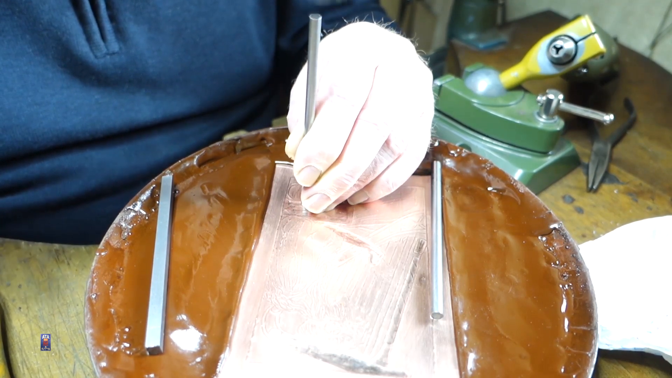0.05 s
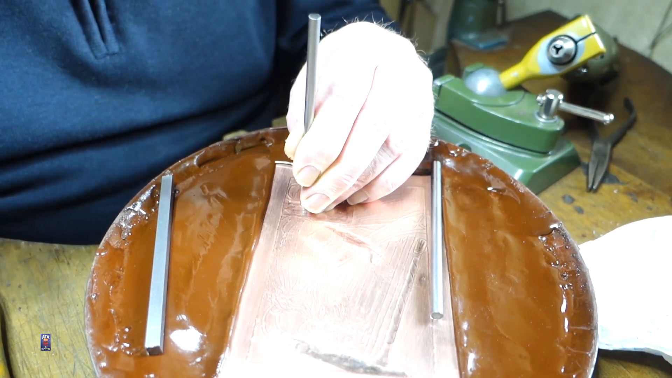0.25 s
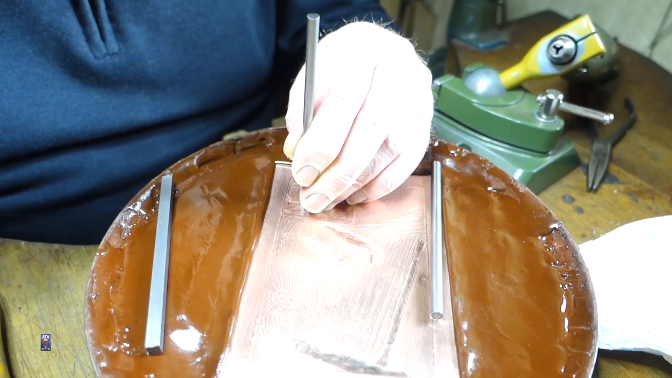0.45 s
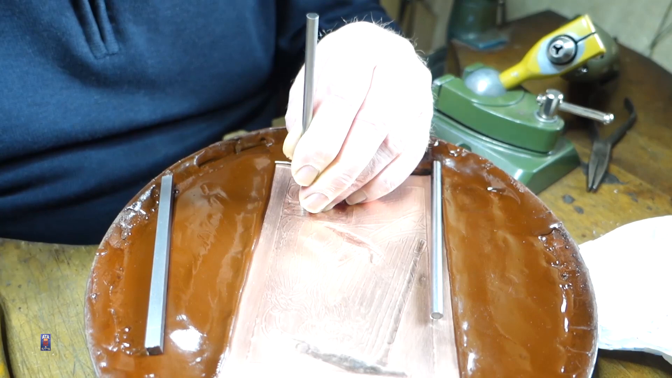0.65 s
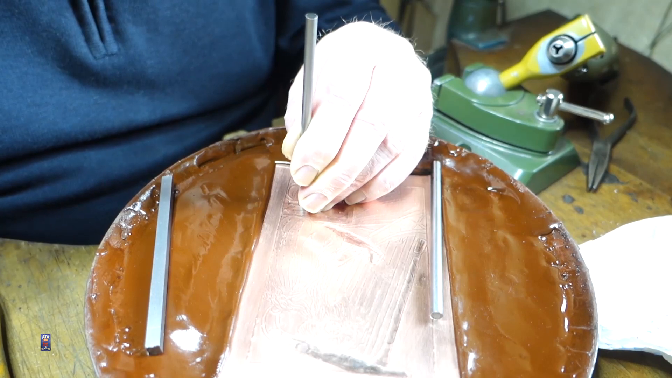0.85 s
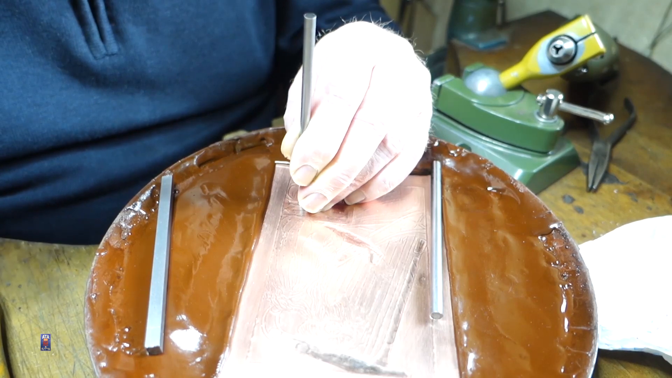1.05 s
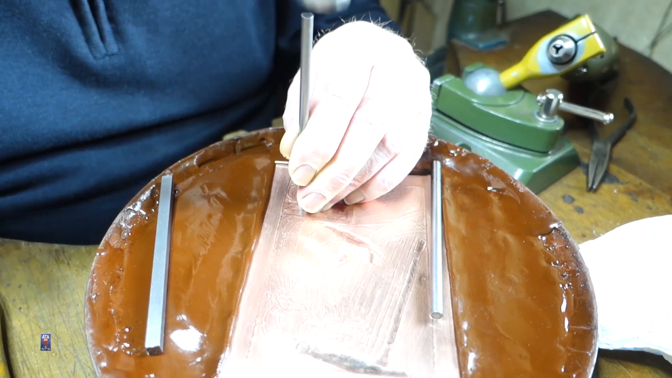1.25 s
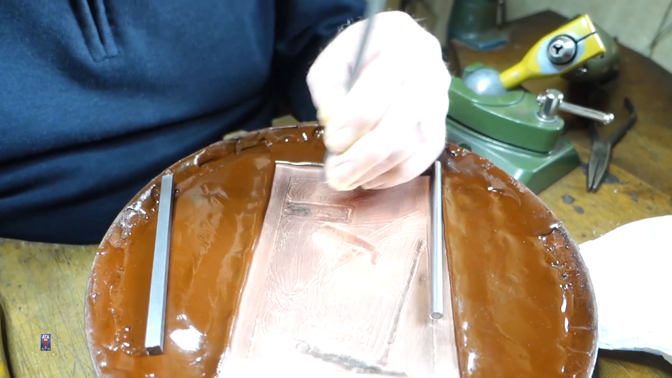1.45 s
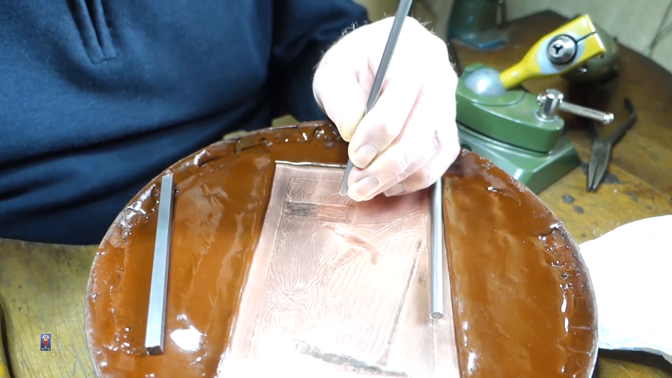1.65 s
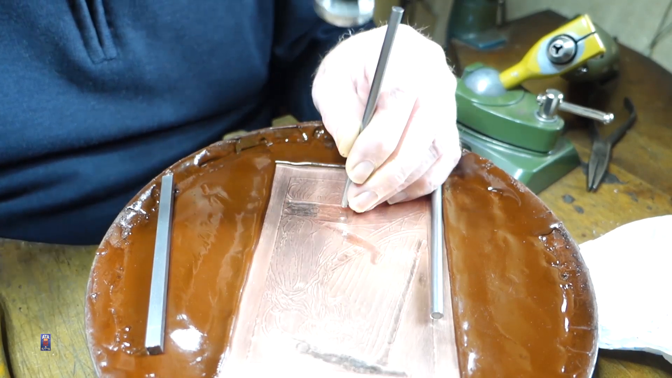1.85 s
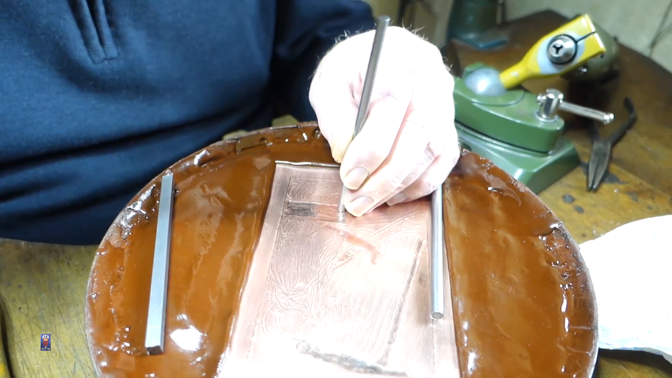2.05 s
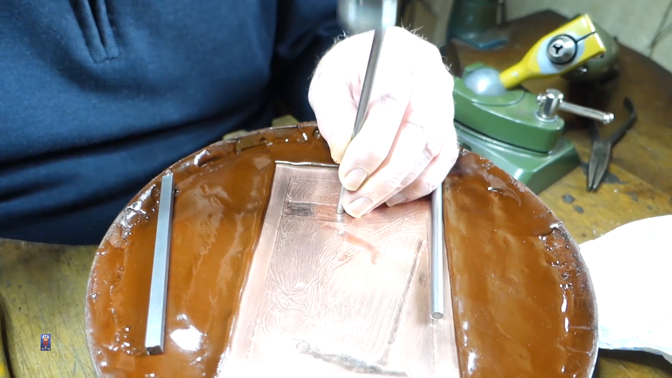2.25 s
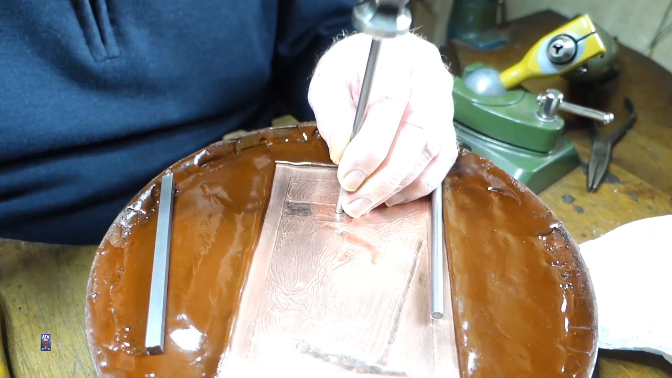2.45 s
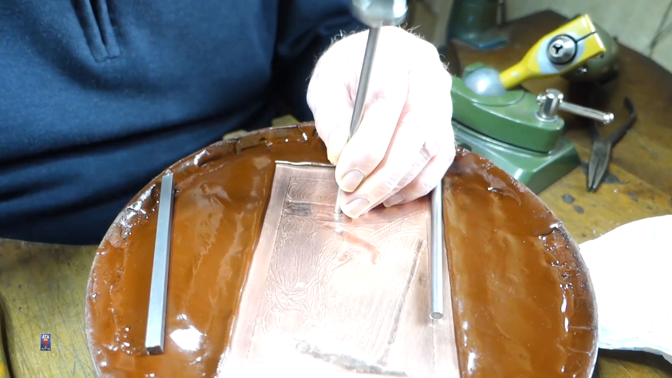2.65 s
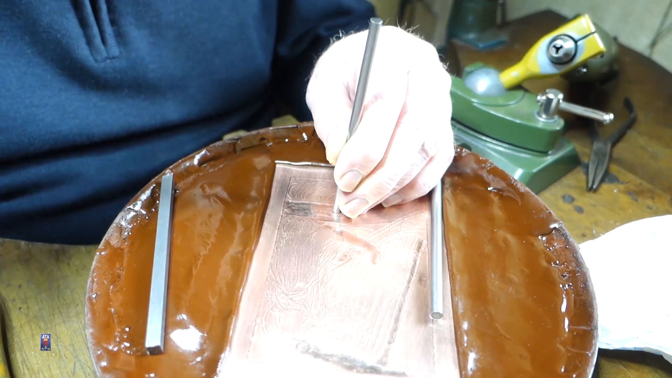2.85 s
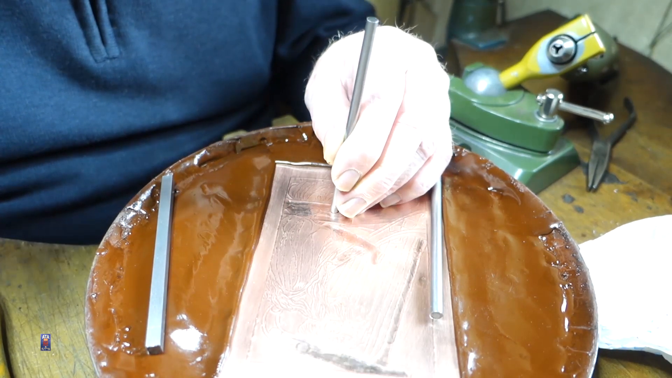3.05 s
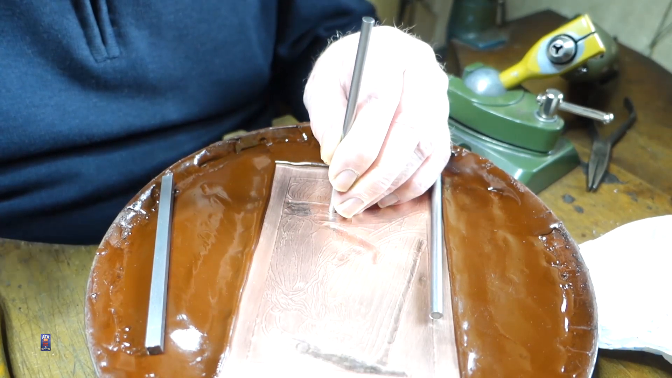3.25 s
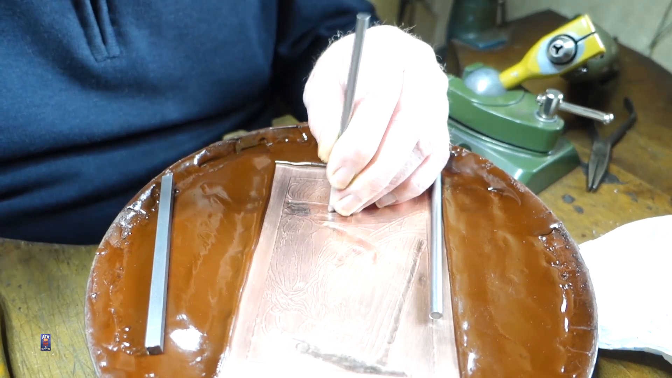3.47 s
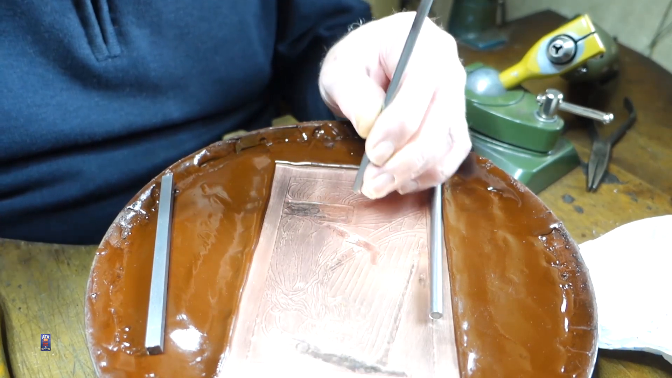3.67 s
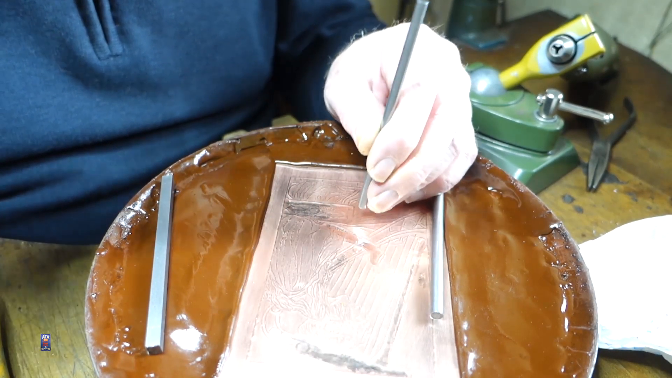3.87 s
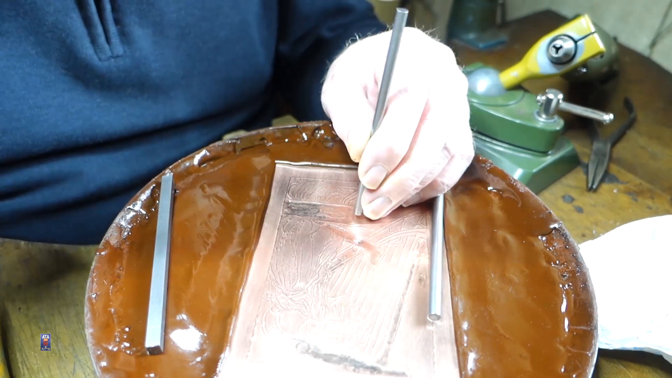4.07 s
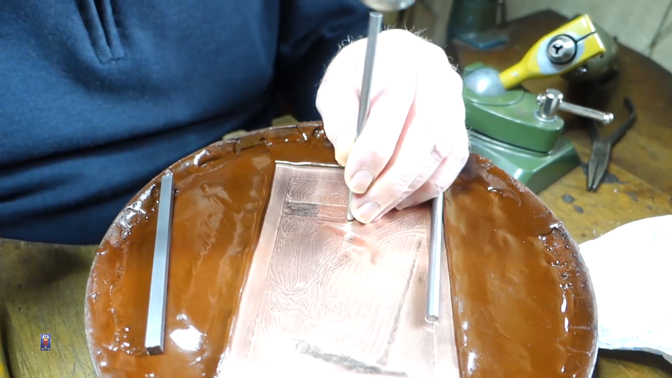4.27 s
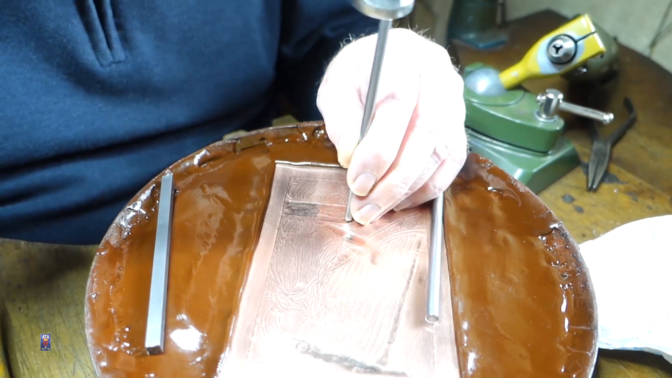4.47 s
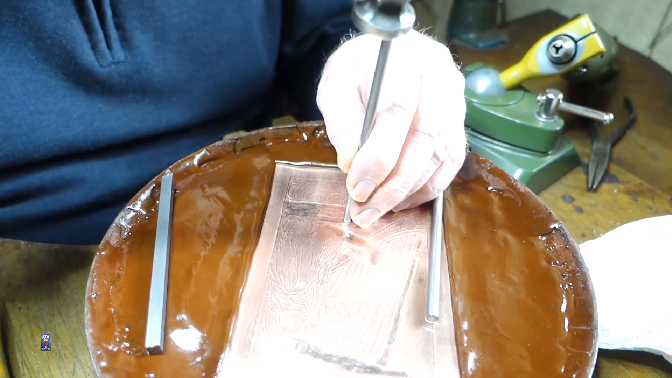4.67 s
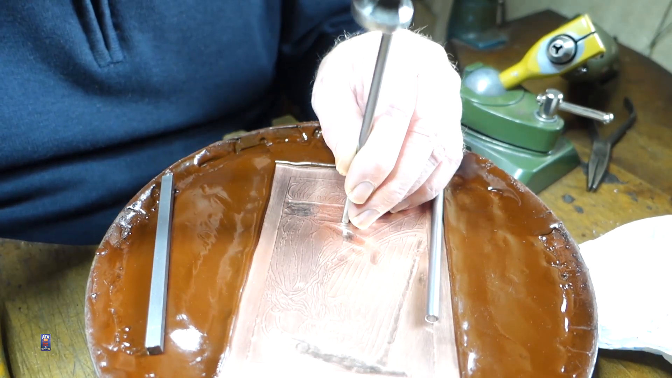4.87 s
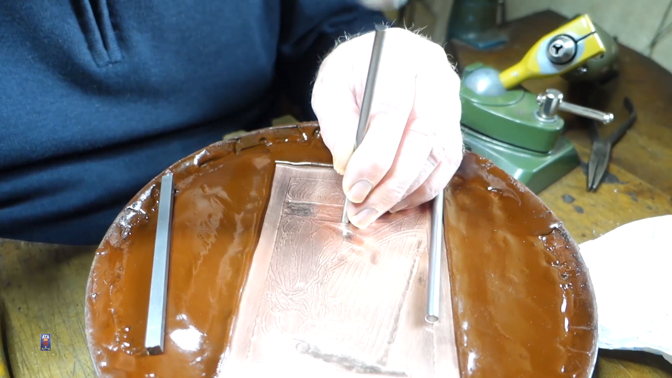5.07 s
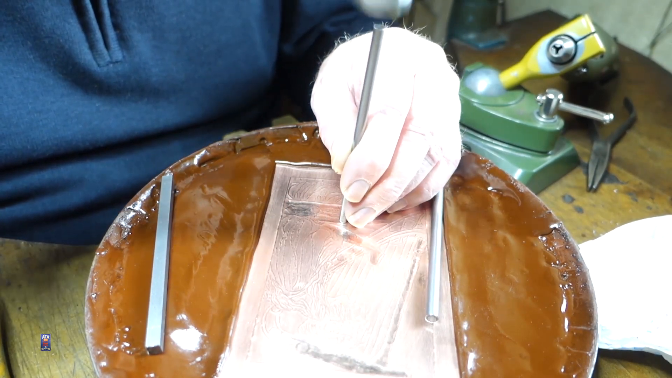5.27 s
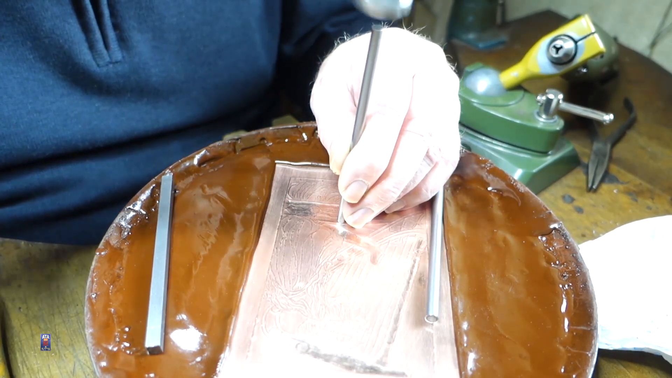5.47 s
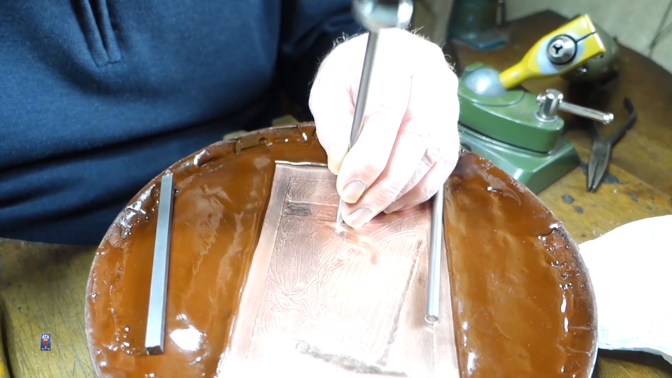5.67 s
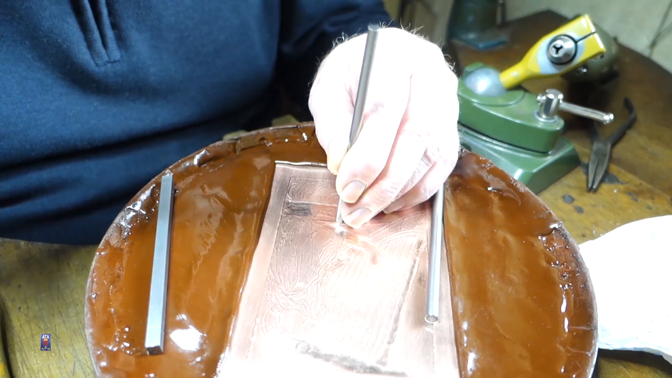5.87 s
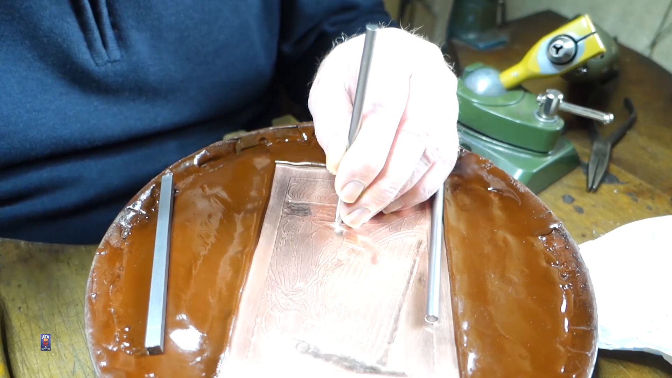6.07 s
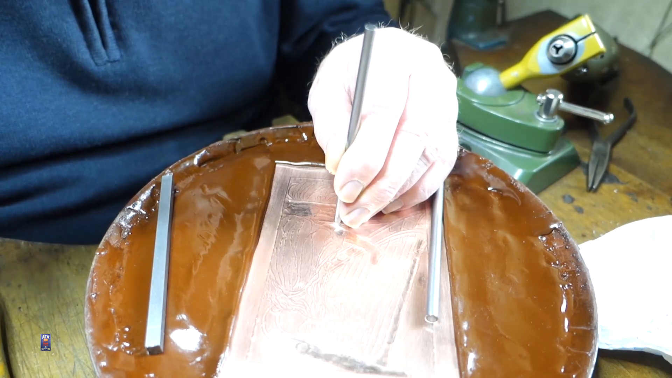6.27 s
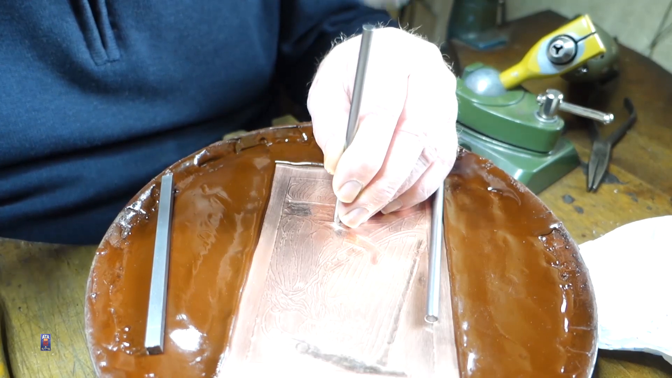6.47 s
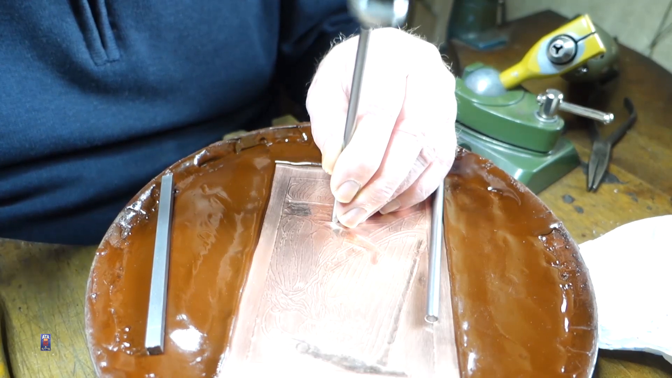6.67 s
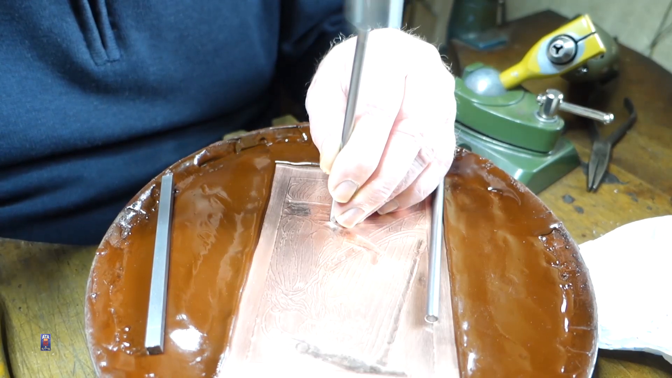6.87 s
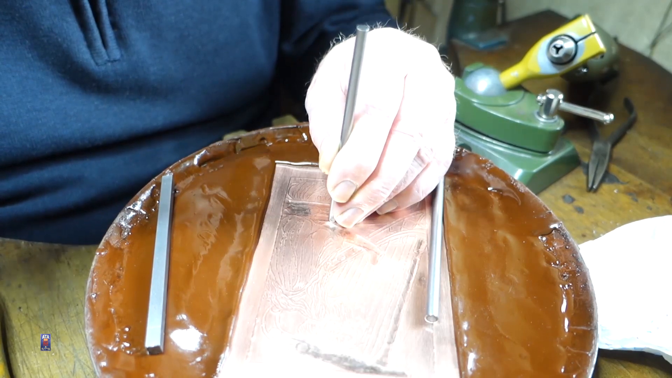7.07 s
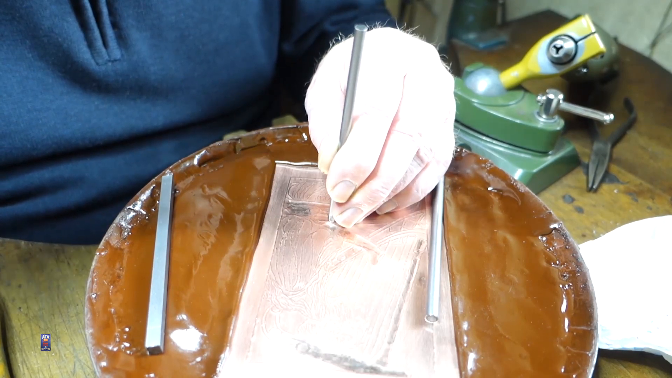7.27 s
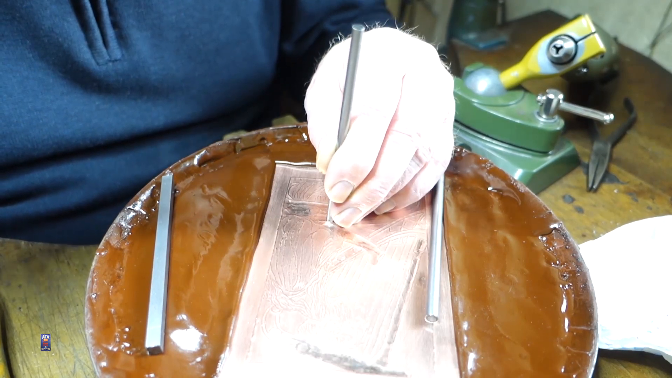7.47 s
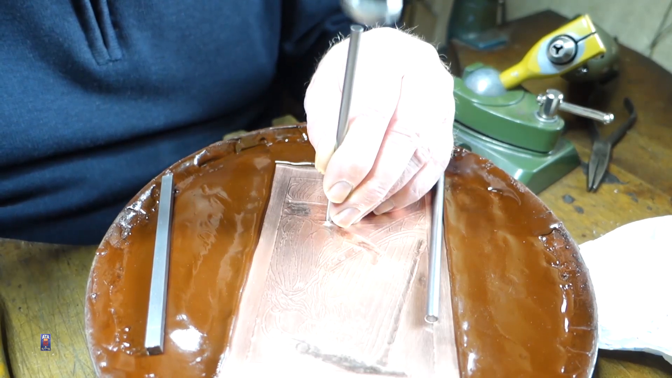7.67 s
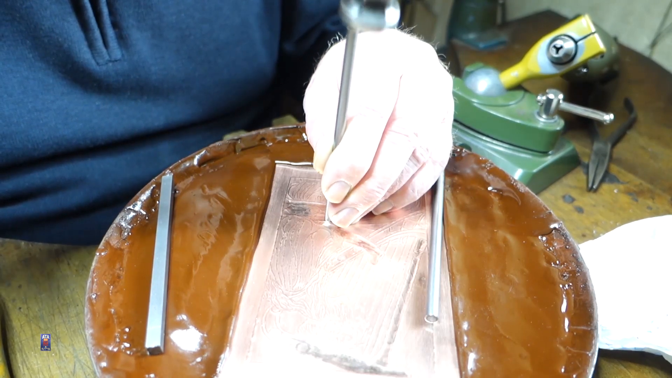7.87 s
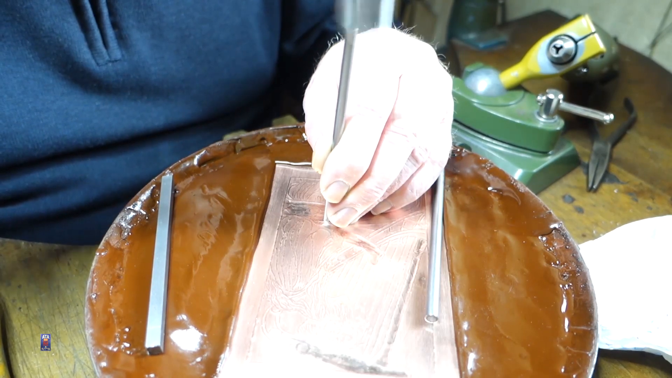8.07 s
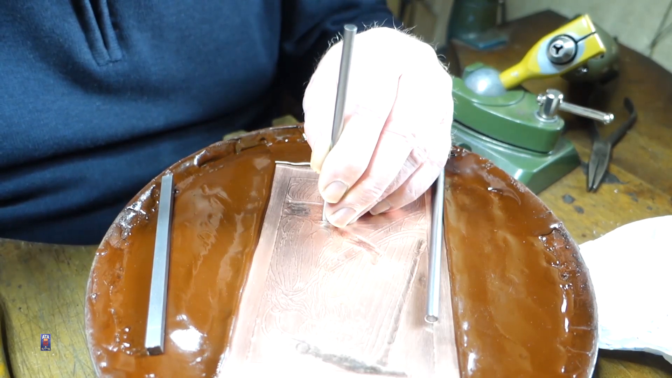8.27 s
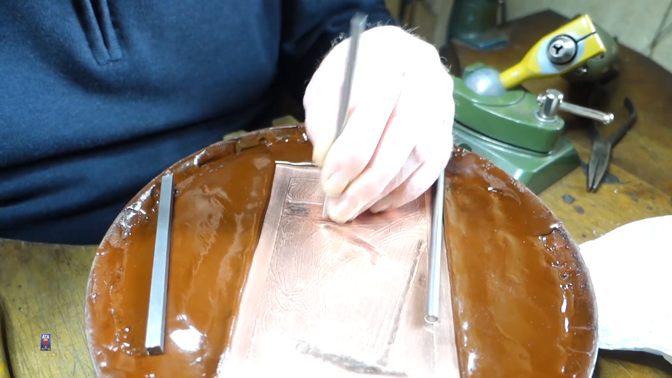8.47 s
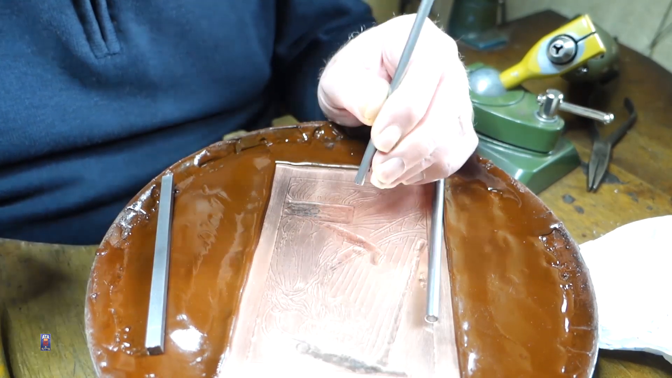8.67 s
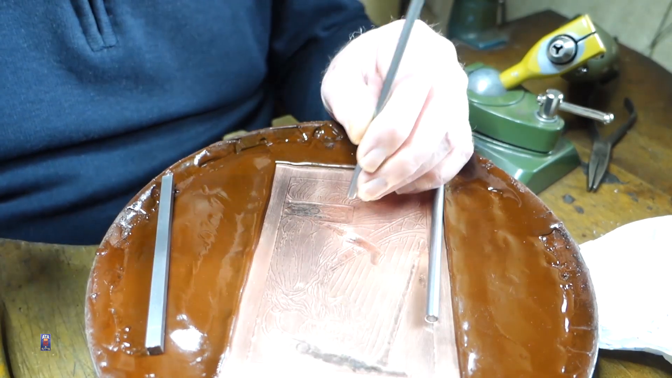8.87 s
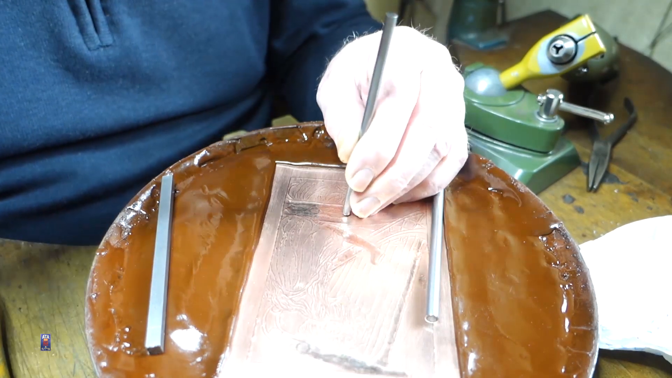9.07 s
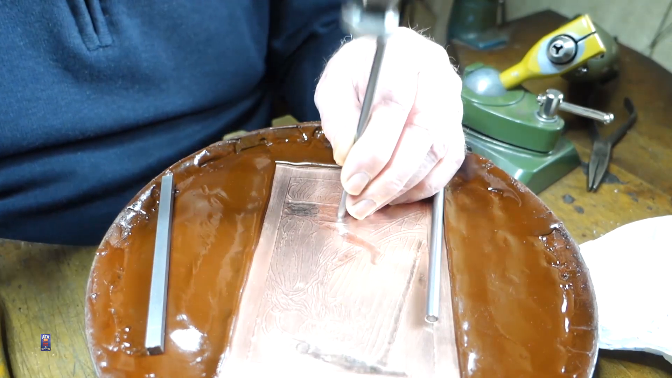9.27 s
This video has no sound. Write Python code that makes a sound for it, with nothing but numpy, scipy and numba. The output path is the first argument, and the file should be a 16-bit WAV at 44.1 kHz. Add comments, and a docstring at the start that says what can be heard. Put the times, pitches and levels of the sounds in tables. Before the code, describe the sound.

A small hammer taps a steel punch on copper sheet, four even ringing blows a second, in three runs with pauses, in a workshop.

```python
"""Chasing copper on a pitch bowl

A small hammer taps a steel punch about four times a second on a copper sheet, in three runs with pauses between.
Each blow is a thud, a noisy crack and damped sines for sheet, hammer and punch; now and then the punch just ticks.
Echoes, standing waves and a fading noise tail make the workshop. Shaped noise and two gliding sines pass as a vehicle.
A limiter ducks the loud strikes, so the room swells up just after them."""
import sys
import numpy as np
from scipy import signal
from scipy.fft import rfft, irfft, next_fast_len
from scipy.io import wavfile
from scipy.ndimage import uniform_filter1d, minimum_filter1d
from numba import njit

SR = 44100
rng = np.random.default_rng(int(sys.argv[2]) if len(sys.argv) > 2 else 0)


def pcm_store(signal):
    """Save signal as 16-bit PCM."""
    levels = np.round(np.clip(np.atleast_2d(signal), -1, 1) * 32767)
    wavfile.write(sys.argv[1], SR, levels.astype(np.int16).T)


N = 411012  # length of the scene [samples]


def undb(db):
    """Turn decibels into an amplitude factor."""
    return 10 ** (np.asarray(db) / 20)


def unit(x):
    """Scale to an energy of one."""
    return x / np.sqrt(np.sum(x ** 2))


def across(hz, table, axis=1):
    """Read one column of a table between its rows, on a log-frequency axis."""
    table = np.array(table, float)
    return np.interp(np.log(np.maximum(hz, 1)), np.log(table[:, 0]), table[:, axis])


def colour(x, spectrum):
    """Filter a sound by a smooth spectrum."""
    size = next_fast_len(x.shape[-1])
    hz = np.arange(size // 2 + 1) * SR / size
    return irfft(rfft(x, size) * undb(across(hz, spectrum)), size)[..., :x.shape[-1]]


def tilted(spectrum, db_per_octave):
    """Brighten or dull a spectrum by a steady slope."""
    return [(hz, db + db_per_octave * np.log2(hz)) for hz, db in spectrum]


def knock(spectrum, size=4096):
    """Make the most compact pulse with this spectrum that does not begin before the hit."""
    hz = np.arange(size // 2 + 1) * SR / size
    # folding the cepstrum (spectrum of the log spectrum) forward in time gives the minimum phase
    cepstrum = irfft(np.log(undb(across(hz, spectrum))))
    cepstrum[1:size // 2] *= 2
    cepstrum[size // 2 + 1:] = 0
    return unit(irfft(np.exp(rfft(cepstrum))))


def ring(modes, t, stretch=1):
    """Add up damped sines, as struck metal rings; a wide resonance dies fast."""
    out = np.zeros(len(t))
    for hz, width, db in modes:
        decay = np.exp(-np.pi * width * t)
        out += undb(db) * width * decay * np.sin(2 * np.pi * hz * stretch * t)
    return unit(out)


def chatter(pulse, decay_s):
    """Smear a pulse into a brief, fading burst of tiny contacts."""
    grit = rng.standard_normal(len(pulse)) * np.exp(-np.arange(len(pulse)) / SR / decay_s)
    return unit(signal.fftconvolve(grit, pulse)[:len(pulse)])


def add(track, s, sound):
    """Lay a sound on a track that starts one second early, so that an earlier blow can ring on."""
    i = SR + int(s * SR)
    track[i:i + len(sound)] += sound


def blows(strike_s=0.0014, contact_s=0.0048, lag_s=0.0005, grit_db=-1, bed_hz=2950):
    """The hammer cracks on the punch; sheet, hammer and bowl follow as the tip sinks in, and the bowl rebounds."""
    # hammer blows; a square blow rings hammer and sheet, a glancing one does not
    # (time [s], force [dB], squareness [dB])
    taps = [(-0.078, -2.5, 0.5), (0.1519, -0.5, -1), (0.3928, -3, 0), (0.62, -2, 0), (0.8378, -2, 0),
            (1.0656, -1.5, -0.5), (1.297, -2, -0.5), (2.198, -22.5, 6.5), (2.4846, 0, 0), (2.7327, 0, 1.5),
            (2.9751, -2.5, 3), (3.219, -2, 2), (3.447, -1, 0), (4.9905, -13, -14.5), (5.2519, -1, -5.5),
            (5.4886, 1, -3.5), (5.7287, 0, -0.5), (5.98, 0.5, 0.5), (6.2382, 1, 0), (6.486, 0, -0.5),
            (6.7195, 1, -3), (6.9588, 0.5, -5.5), (7.1985, -2, 0), (7.4372, -1.5, -1), (7.6857, -2, -1.5),
            (7.921, -1.5, -1.5), (8.1584, -1, -1.5), (8.3974, -2.5, 0.5)]
    # the colour of the blows changes at these times, the last one midway through the third run
    # (begins [s], sheet [dB], hammer [dB], punch ring [dB], punch zing [dB], crack [dB],
    #  crack brightness [dB per octave]); later steps add to these values
    colours = [(-1, 5.5, 6, 3.5, -14, -3.5, -3), (2, -2.9, 5.5, 2.6, -7.5, -1.5, 0),
               (7, -3.5, 10.5, 5, -9, -4, 2.5)]
    # resonances of the struck parts, before each blow shifts their pitch a little
    # (frequency [Hz], width [Hz], relative level [dB])
    sheet_modes = [(1471.5, 61, 18), (1600, 200, 7.5)]
    hammer_modes = [(2307, 97, 11.5), (2550, 80, -16.5), (2178, 240, -0.5), (2580, 490, -53)]
    clink_modes = [(4263, 51, 3), (4350, 420, 0), (4915, 180, 7.5)]
    punch_modes = [(8080, 460, 2.6), (8630, 180, 9), (9254, 750, 14.3), (11040, 96, 7.5)]
    zing_modes = [(15430, 260, 0)]
    # shapes of the bowl's thud, its rebound and the steel crack (frequency [Hz], relative level [dB])
    thud_spectrum = [(20, -23), (45, 13.5), (80, 5), (140, 1), (270, -8.5), (400, -9), (600, 5), (850, 8),
                     (1100, -3.5), (1850, 5.5), (2600, 8.5), (3400, -22), (8000, -76)]
    rebound_spectrum = [(20, -22), (48, 3.5), (75, -8.5), (120, 0), (270, -4), (450, -22.5), (2000, -67.5)]
    crack_spectrum = [(1000, -1.5), (2600, 1), (3300, -30.5), (3800, -9.5), (4300, 4), (4900, -0.5),
                      (5600, 0), (7000, 0), (10300, 2.5), (12200, -3), (14500, 2), (15700, -0.5),
                      (16500, -17)]

    thud_db, clink_db = 0.8, -13.5
    extra_clink_db, clink_fade_s = 22, 0.27  # extra clink just after each colour begins, dying away quickly
    extra_crack_db, crack_fade_s = 3, 0.41  # the crack, too, is louder just after each colour begins
    dulling_per_s = 0.68  # the crack dulls until the next colour [dB per octave, each second]
    steel_slope = 0.45  # the steel parts gain only this many dB for each dB of force
    scatter_db, detune = 0.85, 0.0013  # chance from blow to blow: steel levels, relative pitch
    rebound_s, rebound_db = 0.028, -10.5

    t = np.arange(4096) / SR
    thud, rebound = knock(thud_spectrum), knock(rebound_spectrum)
    # the soft bed of pitch lengthens the push, so the heavy parts get no treble
    bed = signal.butter(8, bed_hz, fs=SR, output="sos")
    out = np.zeros(N + 2 * SR)
    for s, force, square in taps:
        latest = [row for row in colours if row[0] <= s][-1]
        begins, sheet_db, hammer_db, punch_db, zing_db, crack_db, tilt = latest
        age = s - begins
        sheet, hammer, clink, punch, zing = (
            ring(modes, t, 1 + detune * rng.standard_normal())
            for modes in (sheet_modes, hammer_modes, clink_modes, punch_modes, zing_modes))
        metal = undb(sheet_db) * sheet + undb(hammer_db) * hammer
        body = undb(thud_db) * thud + undb(square) * metal
        # the steel faces meet, then chatter for a moment, differently on every blow
        crack = knock(tilted(crack_spectrum, tilt - dulling_per_s * age))
        contact = unit(chatter(crack, strike_s) + undb(grit_db) * chatter(crack, contact_s))
        clink_now_db = clink_db + extra_clink_db * np.exp(-age / clink_fade_s)
        crack_now_db = crack_db + extra_crack_db * np.exp(-age / crack_fade_s)
        steel_db = np.array([punch_db, clink_now_db, crack_now_db, zing_db])
        steel_db = steel_db + steel_slope * force + scatter_db * rng.standard_normal(size=4)
        add(out, s, undb(steel_db) @ np.array([punch, clink, contact, zing]))
        add(out, s + lag_s, undb(force) * signal.sosfilt(bed, body))
        add(out, s + rebound_s, undb(force + rebound_db) * rebound)
    return out


def workshop(diffuse_db=0.07, standing_db=-1.3, gap_s=0.00024, port_lag_s=0.00002, count=26):
    """Stereo response of the room: direct sound, a few echoes, standing waves and a diffuse tail."""
    # diffuse sound; t60 is the time to fade by 60 dB
    # (frequency [Hz], relative level [dB], t60 [s], build-up [s], left-right likeness [0-1])
    diffuse = [(46.3, -3.5, 0.2, 0.07, 1), (129.6, 6, 0.35, 0.01, 1), (295, 4.5, 0.26, 0.028, 0.94),
               (670, 4, 0.25, 0.0037, 0.9), (1470, 6.5, 0.26, 0.008, 0.6), (2064, 10.5, 0.26, 0.016, 0.84),
               (4140, 3, 0.28, 0.0032, 0), (8900, 1, 0.21, 0.0031, 0), (14700, 3, 0.2, 0.003, 0)]
    # standing waves between the walls (frequency [Hz], relative peak level [dB], t60 [s])
    standing = [(46, 15, .75), (123, 11, .45), (152, 15, .5), (174, 11, .45), (252, 16, .25),
                (270, 22, .33), (532, 14, .33), (855, 10, .28), (1016, 17, .27), (1296, 13, .27),
                (1392, 15, .27), (1434, 10, .27), (1484, 11, .27), (1764, 11, .27), (1935, 13, .27),
                (2119, 15, .25), (2216, 20, .25), (2281, 10, .25), (2301, 14, .25), (2381, 16, .25),
                (2434, 15, .25)]
    # echoes off the bench and walls (delay [s], level [dB])
    echoes = [(.0086, -19.5), (.0124, -20.5), (0.0216, -6), (0.034, -11.5), (0.0386, -15), (0.073, -22),
              (.0747, -14)]

    t = np.arange(SR * 3 // 4) / SR
    late = np.maximum(t - gap_s, 0)
    bins = np.fft.rfftfreq(len(t), 1 / SR)
    edges = np.geomspace(25, 18000, count + 1)  # edges of the noise bands [Hz]
    out = np.zeros((2, len(t)))
    for lo, hi in zip(edges, edges[1:]):
        db, t60, rise, alike = (across(np.sqrt(lo * hi), diffuse, axis=k) for k in range(1, 5))
        band = (bins >= lo) & (bins < hi)
        noise = irfft(rfft(rng.standard_normal((2, len(t)))) * band, len(t))
        swell = (1 - np.exp(-late / rise)) * np.exp(-np.log(1000) * late / t60)
        mid, side = (unit(n * swell) * np.sqrt(band.mean()) for n in noise)
        # mid is shared by both sides; side has opposite signs left and right
        stereo = np.sqrt((1 + alike) / 2) * mid + np.sqrt((1 - alike) / 2) * np.array([side, -side])
        out += undb(db + diffuse_db) * stereo

    port_t = t - np.array([[0], [port_lag_s]])  # the right port hears the waves slightly later
    for hz, db, t60 in standing:
        decay = np.log(1000) / t60
        wave = np.exp(-decay * t) * np.cos(2 * np.pi * hz * port_t)
        out += undb(db + standing_db) * 2 * decay / SR * wave

    # cluttered surfaces scatter the treble and return only the lower notes
    bounce = signal.windows.hann(11)
    for s, db in echoes:
        i = int(s * SR)
        out[:, i:i + len(bounce)] += undb(db) * bounce / bounce.sum()
    out[:, 0] += 1  # direct sound
    return out


def shaded_ports(taps):
    """Colour left and right in opposite ways, as the left microphone port is shaded."""
    # (frequency [Hz], left minus right [dB])
    shade = [(100, -0.3), (600, 0.1), (1300, -3.5), (2400, -4.5), (4400, -6.5), (8000, -8), (15000, -7.5)]
    ports = []
    for x, sign in zip(taps, (1, -1)):
        half_shade = [(hz, sign * db / 2) for hz, db in shade]
        ports.append(colour(x, half_shade))
    return np.array(ports)


def air(spectrum, wide_hz=900):
    """Make steady stereo noise whose bass is the same at both ports; the shared part has an rms of one."""
    mid, side = colour(rng.standard_normal((2, N)), spectrum)
    side = signal.sosfilt(signal.butter(1, wide_hz, "high", fs=SR, output="sos"), side)
    return np.array([mid + side, mid - side]) / mid.std()


def background(floor_db=-54.0):
    """A steady, mostly low noise lies under everything."""
    # (frequency [Hz], relative level [dB])
    floor = [(20, -26.5), (45, 0), (90, -7.5), (150, 6.5), (220, -11.5), (450, -13), (1000, -19.5),
             (3000, -26), (5000, -31), (10000, -32.5), (15500, -30.5), (16500, -48)]
    return undb(floor_db) * air(floor)


def walk(rate):
    """Drift slowly by chance, with a spread near one and a new target `rate` times a second."""
    k = int(SR / rate)
    return uniform_filter1d(np.repeat(rng.standard_normal(N // k + 1), k), k)[:N]


def vehicle():
    """Road noise and two wavering engine notes swell and fade as they pass, dulled by the walls."""
    # shape of the road noise (frequency [Hz], relative level [dB])
    road = [(25, -11), (70, 5.5), (150, 2), (240, -1), (350, -8.5), (650, -13.5), (1200, -22),
            (2200, -20.5), (4000, -32.5), (7000, -37)]
    # swell of the road noise outside (time [s], level [dB])
    road_level = [(0, -58), (1.8, -61.5), (2.3, -50), (3.0, -48), (3.9, -56.5), (4.45, -47), (4.75, -45.5),
                  (5.4, -47), (8.7, -57.5), (9.3, -57.5)]
    # engine notes, before they waver
    # (loudest at [s], pitch then [Hz], rise [Hz per s], level [dB], half-width of the swell [s])
    engine = [(3.7, 149.8, 0.982, -45.5, 0.69), (4.25, 217, 35, -50, 0.21)]
    falloff_db = 14.5  # fade of a note, three half-widths from its loudest moment
    waver, flutter_db = 0.015, 2  # chance in relative pitch and in level

    t = np.arange(N) / SR
    road_s, road_db = np.transpose(road_level)
    out = undb(np.interp(t, road_s, road_db)) * air(road)
    for s, hz, rise, db, width in engine:
        swell_db = -falloff_db * np.log10(1 + ((t - s) / width) ** 2)
        pitch = (hz + rise * (t - s)) * (1 + waver * walk(17))
        phase = 2 * np.pi * np.cumsum(pitch) / SR
        out += np.sqrt(2) * undb(db + swell_db + flutter_db * walk(9.1)) * np.sin(phase)
    return out


def touches(touch_db=2.0, contact_s=0.002):
    """Setting down or nudging the punch gives dry ticks of its tip on the sheet, each a short noisy pulse."""
    # (time [s], relative energy [dB], brightness [dB per octave])
    touch_times = [(2.134, -19.5, -0.5), (3.8404, -20.5, -3.5), (3.9601, -18, -2), (4.595, -15.5, 1.5),
                   (9.2555, -15, 0)]
    # shape of a tick before brightening (frequency [Hz], relative level [dB])
    tick_spectrum = [(300, -12), (1000, -10), (1500, 12), (1850, 1), (2350, 10), (3200, -7), (4400, -1.5),
                     (6000, -11), (9500, -15), (15500, -33)]
    out = np.zeros(N + 2 * SR)
    for s, db, tilt in touch_times:
        tick = knock(tilted(tick_spectrum, tilt))
        add(out, s, undb(db + touch_db) * chatter(tick, contact_s))
    return out


def scene(near_share=0.8):
    """Taps in the room, heard through two unequally shaded ports, over the background and vehicle."""
    ticks = touches()
    # light touches barely move the bowl, so less of them reaches the walls
    into_room = blows() + (1 - near_share) * ticks
    room = signal.fftconvolve(into_room[None], workshop(), axes=1)
    # leave out the early second
    taps = room[:, SR:SR + N] + near_share * ticks[SR:SR + N]
    return shaded_ports(taps) + vehicle() + background()


@njit
def hold_peaks(over, fall):
    """Jump to each new peak, then relax."""
    out, e = np.empty(len(over)), 0.
    for i in range(len(over)):
        e = max(over[i], e * fall + 1e-18)
        out[i] = e
    return out


def record(dry, ceiling_db=-5, release_s=0.014, size=24, top_hz=15900):
    """A fast limiter turns down just ahead of each loud peak and recovers; then the top treble is cut off."""
    peak_db = 20 * np.log10(np.abs(dry).max(axis=0) + 1e-9)
    over_db = np.maximum(peak_db - ceiling_db, 0)
    gain = undb(-hold_peaks(over_db, np.exp(-1 / (release_s * SR))))
    # look a few samples ahead, then smooth the steps
    gain = uniform_filter1d(minimum_filter1d(gain, size), size)
    return signal.sosfilt(signal.ellip(8, .2, 70, top_hz, fs=SR, output="sos"), dry * gain)


dry = scene()
out = record(dry)
pcm_store(out)
```